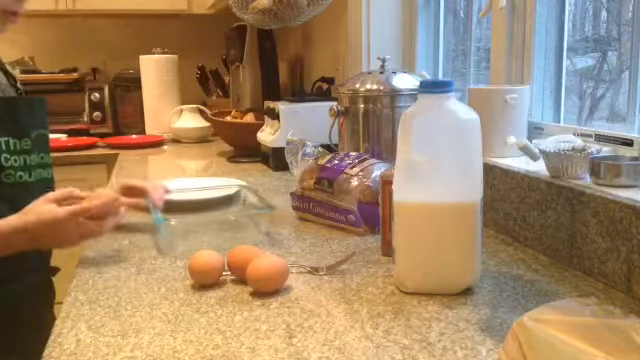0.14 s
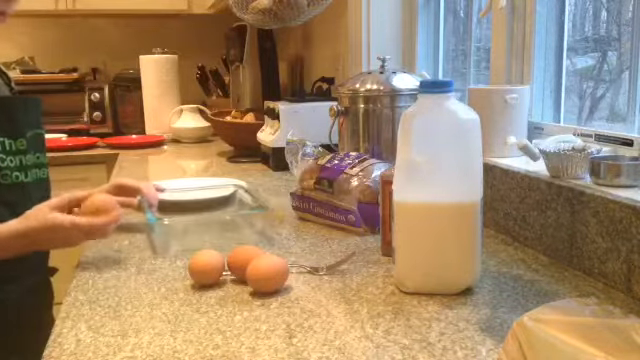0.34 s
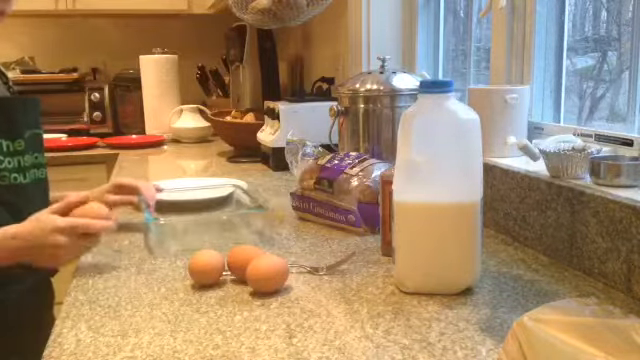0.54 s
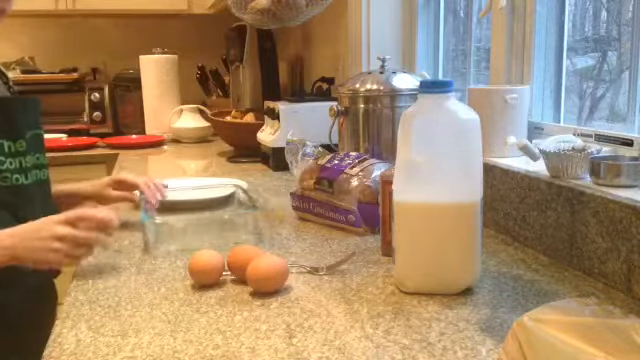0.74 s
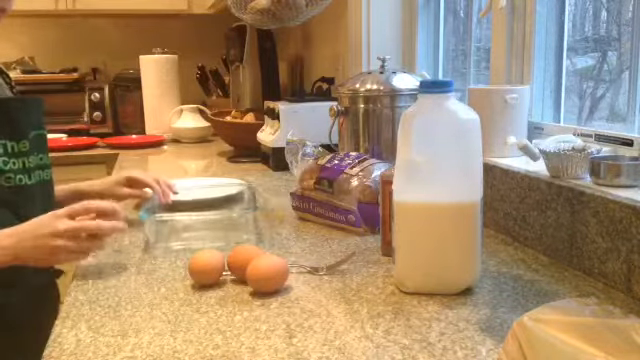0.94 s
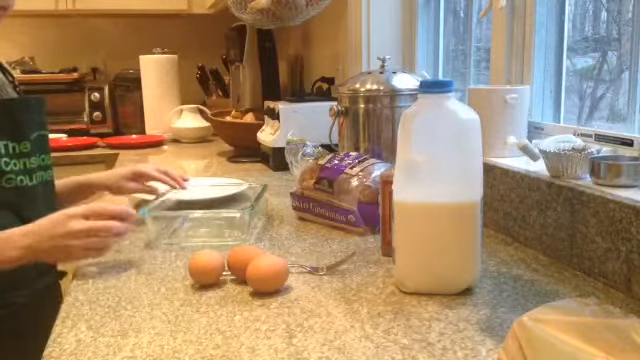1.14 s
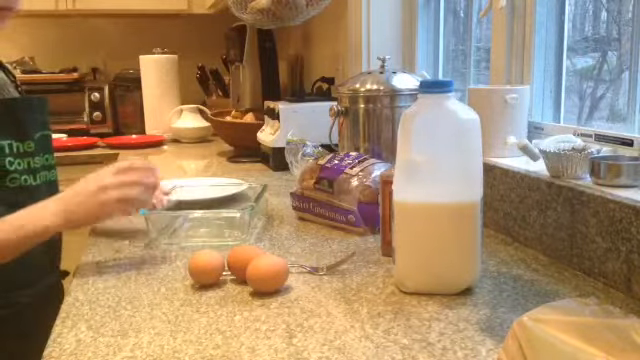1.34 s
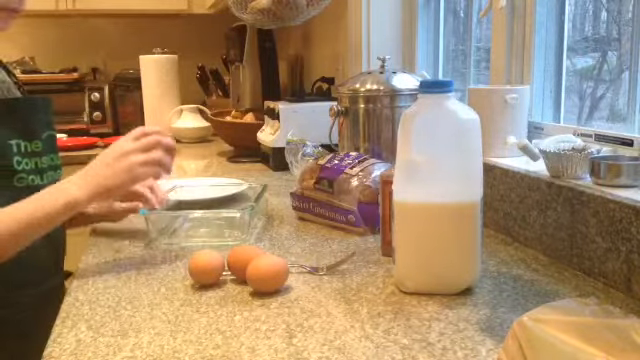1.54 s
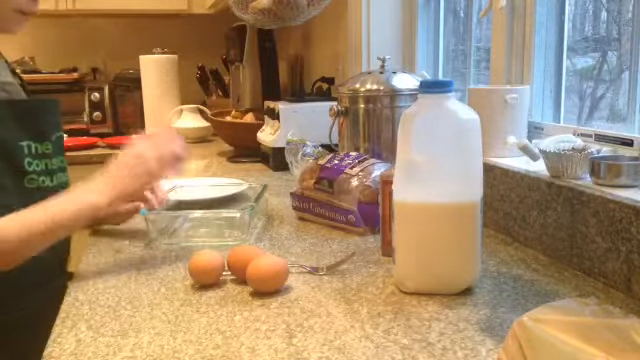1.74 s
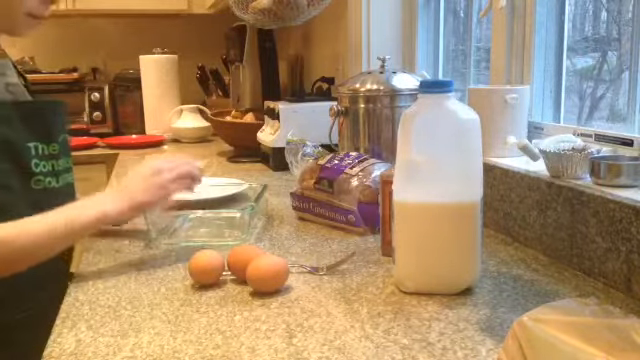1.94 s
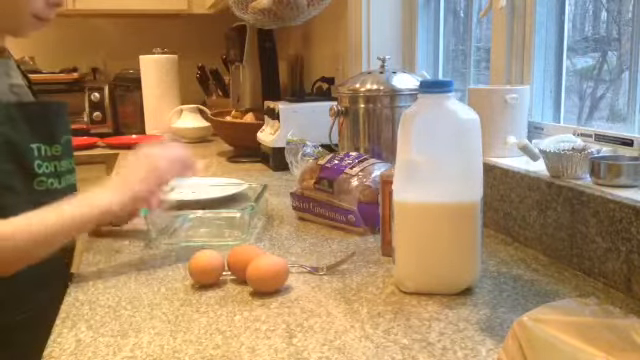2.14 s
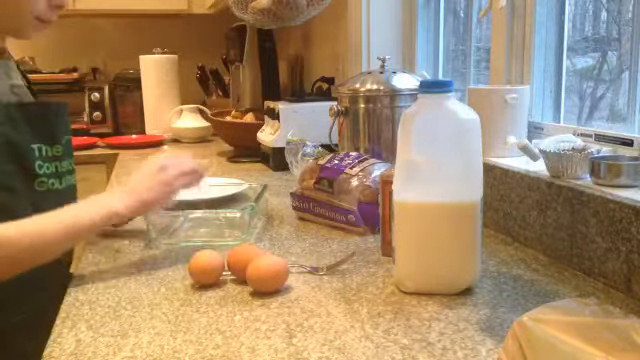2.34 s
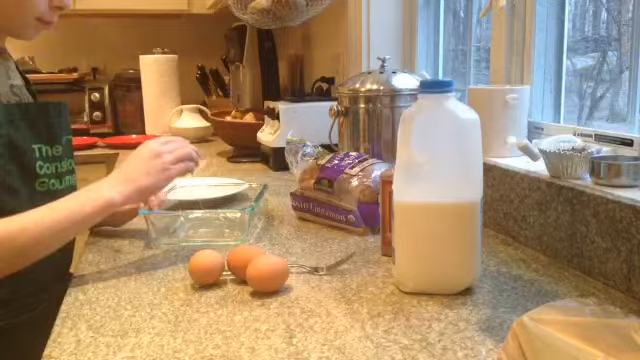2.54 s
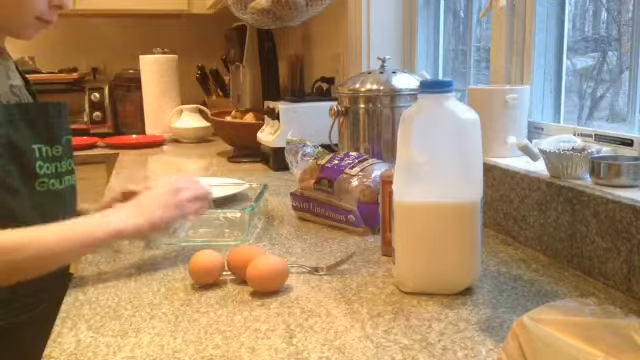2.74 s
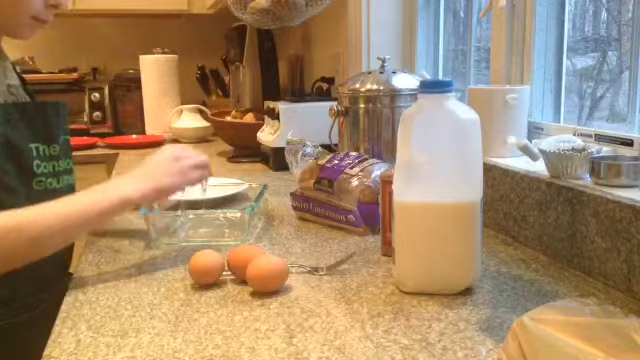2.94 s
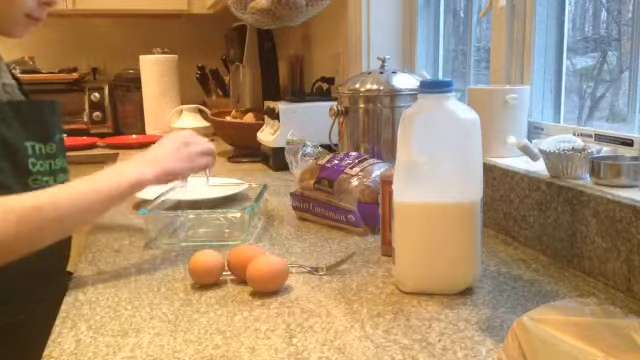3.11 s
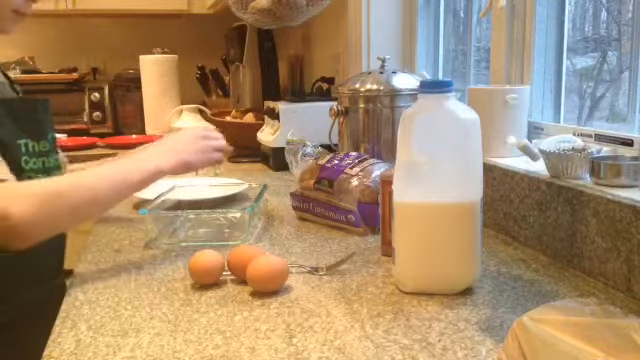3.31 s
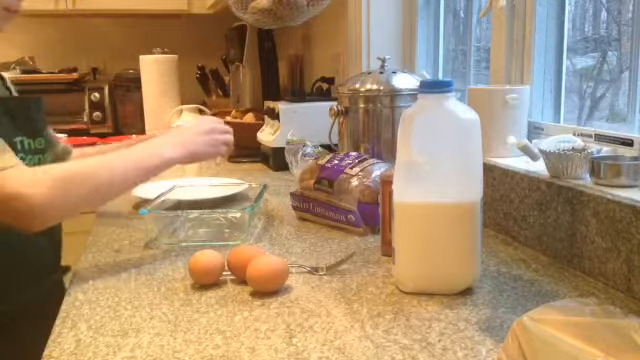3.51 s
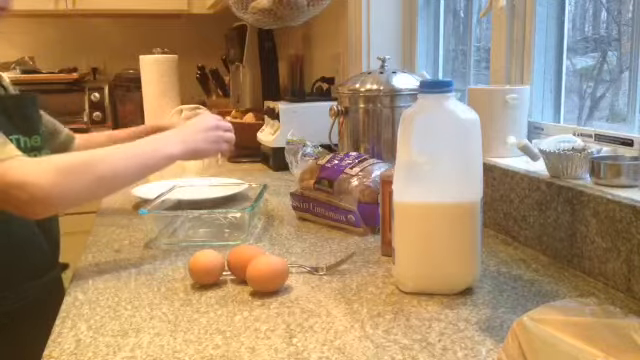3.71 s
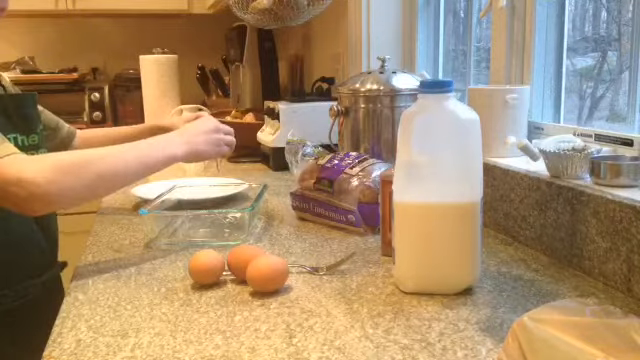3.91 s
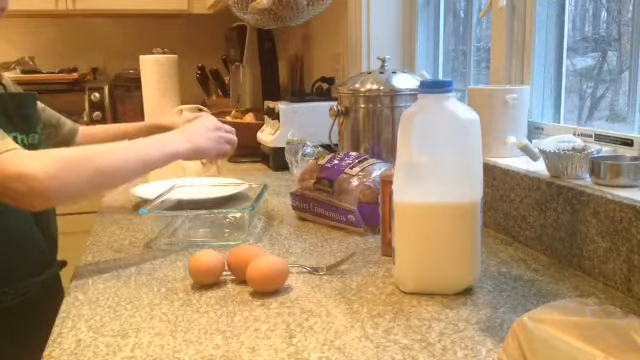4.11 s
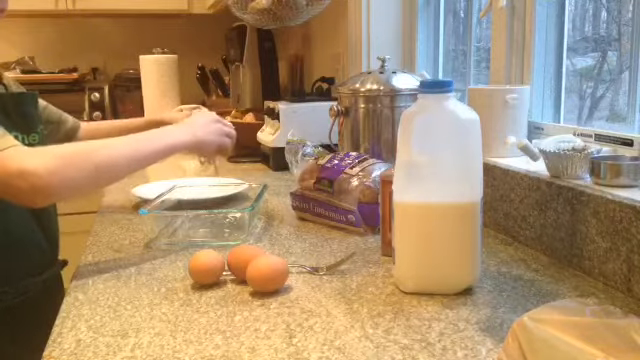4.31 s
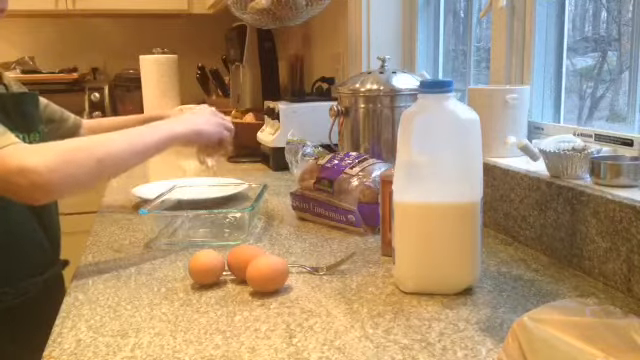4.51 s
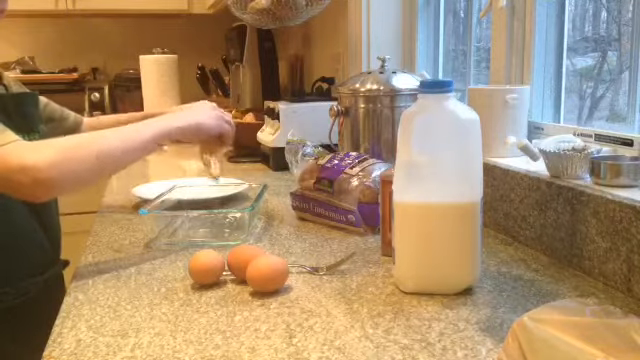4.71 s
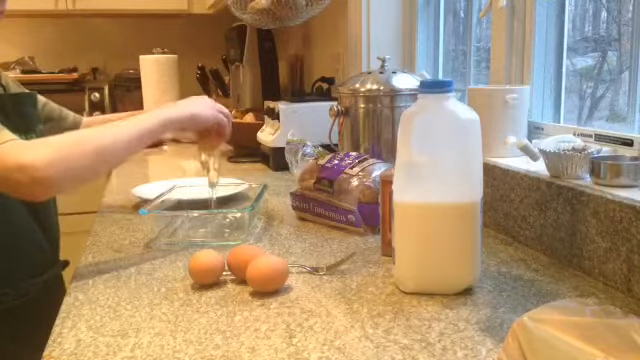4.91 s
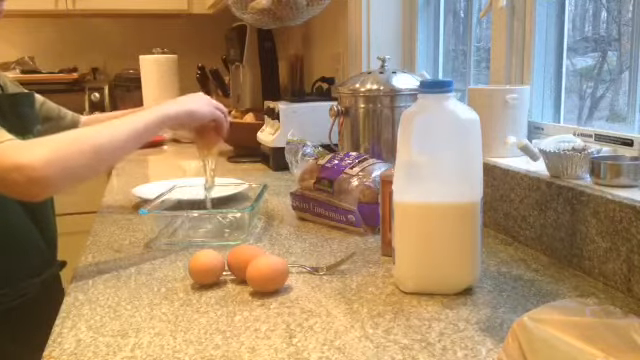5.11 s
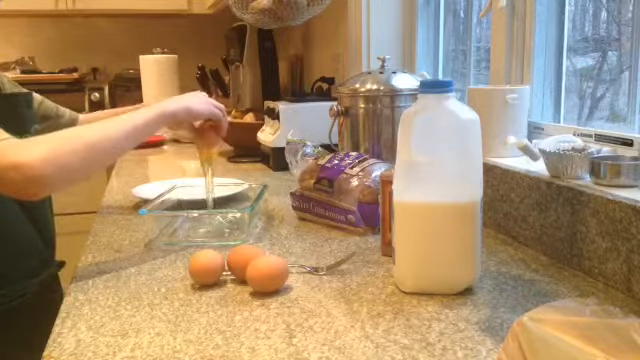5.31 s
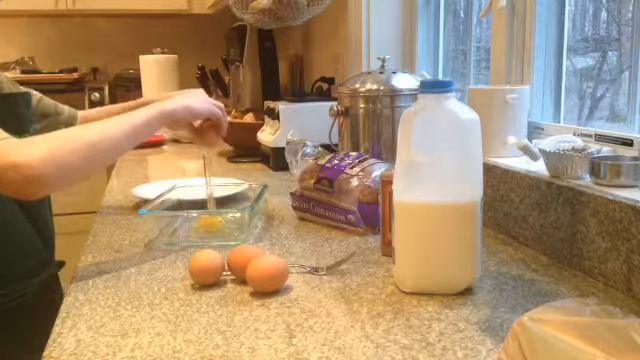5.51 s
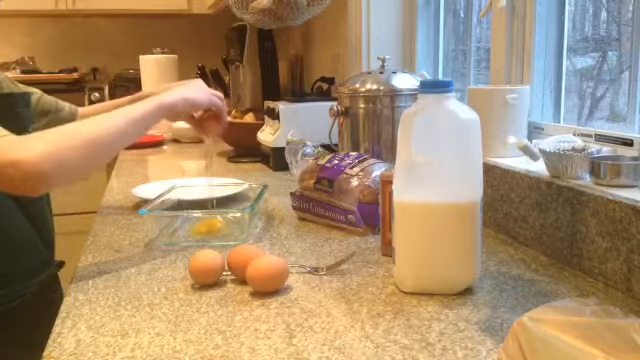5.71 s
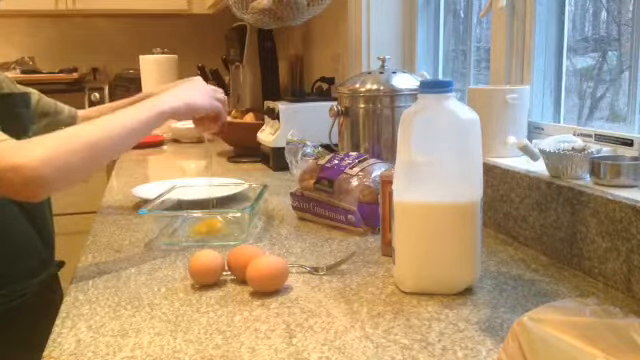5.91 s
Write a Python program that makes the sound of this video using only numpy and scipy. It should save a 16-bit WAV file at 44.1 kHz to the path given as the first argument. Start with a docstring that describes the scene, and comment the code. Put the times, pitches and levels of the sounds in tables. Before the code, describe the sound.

A glass dish scrapes on a stone counter, then an egg is knocked three times on its rim and pried open with wet crackles.

```python
"""Over the faint, steady hum of an appliance, a glass dish is nudged into place on a stone counter:
it scrapes, bumps and skids, while fingers tick on an egg. The egg is knocked three times on the rim;
each impact crushes shell and sets the glass ringing, and the dish rocks back after the last two.
Thumbs pry the shell apart in brittle snaps and crackles, the wet inside squelches, and it drops into
the dish with a light clink. The hard room reverberates after every sound, heard at one microphone."""
import sys
import numpy as np
from scipy import signal
from scipy.fft import rfft, irfft
from scipy.io import wavfile

SR = 44100
rng = np.random.default_rng(int(sys.argv[2]) if len(sys.argv) > 2 else 0)


def wrap_up_sound(samples):
    """Save the sound to the file named by the first command line argument, as 16-bit audio."""
    columns = np.atleast_2d(samples).T
    # keep every value between -1 and 1, then stretch to whole-number steps
    tamed = np.clip(columns, -1, 1)
    steps = np.round(tamed * 32767).astype(np.int16)
    wavfile.write(sys.argv[1], SR, steps)


N = 262395
TIME = np.arange(N) / SR
BURST_TIME = np.arange(SR // 5) / SR   # time axis of one contact

# blows of the egg on the rim, in which the shell cracks, gives way and knocks the dish:
# start_s, crack_db, give_s, knock_db, crush_s, knock_tilt_db_per_octave, ring_db
EGG_BLOWS = [(1.8555, -20, 0.00096, -8, .007, 1.26, -17), (2.2362, -18, .0028, -8.5, .0034, 3, -23.5),
             (2.731, -24, .0078, -12, .0029, -2.5, -33)]
# spectrum of fracturing eggshell: frequency_hz, density_db
SHELL_SPECTRUM = [(300, -18), (800, -13), (1500, -4), (2800, -3), (4400, -4), (6200, -2.5), (9300, -1.5),
                  (11500, -7.5), (15500, -4.5)]


def from_db(db):
    """Amplitude ratio of a level in decibels."""
    return 10 ** (np.asarray(db) / 20)


def unit(x):
    """Normalisation to an energy of 1."""
    return x / np.sqrt(np.sum(x ** 2) + 1e-20)


def at_level(x, db):
    """Equivalent level: the energy of the sound, packed into 10 ms, has this rms level."""
    return unit(x) * np.sqrt(SR / 100) * from_db(db)


def at_hz(points, hz):
    """Interpolation of a table on a logarithmic frequency axis."""
    table_hz, values = np.transpose(points)
    return np.interp(np.log(hz + 1), np.log(table_hz), values)


def add(track, start_s, sound):
    """Superposition: a sound sums into the track from its start time."""
    start = int(round(start_s * SR))
    track[start:start + len(sound)] += sound[:N - start]


def colour(x, spectrum, tilt_db=0, size=4096):
    """Minimum-phase filtering by a spectrum, tilted by tilt_db per octave above 1 kHz."""
    hz = np.arange(size // 2 + 1) * SR / size
    db = at_hz(spectrum, hz) + tilt_db * np.log2(np.maximum(hz / 1000, 1))
    cepstrum = irfft(np.log(from_db(db)))
    causal = 2 * cepstrum[:size // 2] * (np.arange(size // 2) > 0)
    response = irfft(np.exp(rfft(causal, size)))
    return signal.fftconvolve(x, response)[:len(x)]


def resonance(x, hz, width_hz):
    """A damped oscillator: a two-pole band-pass that rings longer the narrower it is."""
    radius = np.exp(-np.pi * width_hz / SR)
    feedback = [1, -2 * radius * np.cos(2 * np.pi * hz / SR), radius * radius]
    return signal.lfilter([1, 0, -1], feedback, x + 1e-18)


def double_resonance(x, hz, width_hz):
    """Two equal resonators in cascade give a peak with steeper skirts."""
    return resonance(resonance(x, hz, width_hz), hz, width_hz)


def grains(count, per_s, spread_db):
    """Shot noise: impulses at random times, of random sign and size."""
    sizes = from_db(spread_db * np.minimum(rng.exponential(1, count), 4)) * rng.choice([-1, 1], count)
    return sizes * (rng.random(count) < per_s / SR)


def contact(length_s, first=0.34, per_s=5000):
    """Rough contact: an impulse of size `first`, then a decaying spray of micro-fractures or slips."""
    decay = np.exp(-BURST_TIME / length_s)
    spray = unit(grains(len(BURST_TIME), per_s, spread_db=3.5) * decay)
    spray[0] += first
    return spray


def appliance(air_db=-58.5):
    """Broadband air noise lies under the tones of a motor, each slowly modulated in amplitude."""
    # steady noise of the room: frequency_hz, density_db
    air_spectrum = [(30, -31), (80, -24), (105, -5), (150, -4), (200, 2), (350, 0.5), (450, -12.5),
                    (1000, -11.5), (1400, -20.5), (2000, -25), (3000, -30), (6000, -30.5), (10000, -32),
                    (15000, -35.5)]
    # tones of the motor: pitch_hz, rms_level_db
    motor_tones = [(119.7, -66), (191, -69.5), (239.5, -62.5), (330, -68)]
    out = from_db(air_db) * unit(colour(rng.standard_normal(N), air_spectrum)) * np.sqrt(N)
    knots_s = np.linspace(0, TIME[-1], 60)
    for hz, db in motor_tones:
        swell = 1 + .35 * np.interp(TIME, knots_s, rng.standard_normal(len(knots_s)))
        out += from_db(db) * np.sqrt(2) * swell * np.sin(2 * np.pi * (hz * TIME + rng.random()))
    return out


def dish_slide():
    """Sliding friction: countless small slips of glass on stone merge into a scrape."""
    # envelope of the scrape: time_s, level_db
    slide_levels = [(0, -59.5), (.05, -49.5), (.13, -55.5), (.17, -49.5), (.24, -51), (.29, -59),
                    (.41, -57), (.6, -61.5), (.81, -60.5), (.92, -51.5), (1.12, -49), (1.15, -59),
                    (1.25, -61), (1.84, -63.5)]
    # glass sliding on stone: frequency_hz, density_db
    scrape_spectrum = [(200, -7), (450, -11.5), (780, -3), (1150, -8), (1400, 4), (1700, -5.5), (2300, -9),
                       (3000, -21), (3700, -17.5), (4300, -14), (5200, -29.5), (7600, -25.5), (15000, -40)]
    times_s, levels_db = np.transpose(slide_levels)
    envelope = from_db(np.interp(TIME, times_s, levels_db, left=-200, right=-200))
    slips = grains(N, per_s=1700, spread_db=2.0)
    return envelope * unit(colour(slips, scrape_spectrum)) * np.sqrt(N)


def dish_squeak(start_s=.025, level_db=-40, pitch_hz=2050, length_s=.05):
    """Friction excites a narrow resonance as the glass starts to move."""
    out = np.zeros(N)
    squeak = resonance(contact(length_s, first=0), pitch_hz, width_hz=260)
    add(out, start_s, at_level(resonance(squeak, pitch_hz, width_hz=370), level_db))
    return out


def dish_bumps(bump_db=-9.5, thud_db=-17.5, thud_hz=290, firm_contact_s=0.00538):
    """Contact time shapes an impact: the longer and softer it is, the less treble and the more thud."""
    # hand and dish bumping on the counter: start_s, level_db, contact_s
    bumps = [(.468, -33, 0.015), (.481, -26, 0.013), (0.536, -43.5, 0.019), (0.735, -30.5, 0.0036),
             (.921, -29, 0.0077), (1.063, -32.5, 0.0043), (1.079, -28, 0.0061), (1.114, -28.5, 0.0039)]
    # a firm bump: frequency_hz, density_db
    bump_spectrum = [(150, -11.5), (320, -5.5), (460, -8), (850, 1), (1400, -4), (2200, -8), (3000, -13),
                     (4200, -20.5), (6000, -36.5), (15000, -58.5)]
    dulling_db_per_octave, thud_gain_db = 6.5, 10   # for each doubling of contact time
    out = np.zeros(N)
    for start_s, db, contact_s in bumps:
        doublings = np.log2(contact_s / firm_contact_s)
        bump = colour(contact(contact_s, first=0.3), bump_spectrum, -dulling_db_per_octave * doublings)
        add(out, start_s, at_level(bump, db + bump_db))
        thud = resonance(contact(contact_s), thud_hz, width_hz=26.5)
        thud = resonance(thud, thud_hz, width_hz=63)
        add(out, start_s, at_level(thud, db + thud_db + thud_gain_db * doublings))
    return out


def finger_ticks(length_s=0.0022, width_hz=1800):
    """Brief finger contacts excite high, heavily damped resonances of the whole egg."""
    # touches as the egg is held ready: start_s, level_db, pitch_hz
    ticks = [(0.547, -52.5, 5950), (0.582, -59, 7640), (0.863, -57, 8700)]
    out = np.zeros(N)
    for start_s, db, hz in ticks:
        add(out, start_s, at_level(double_resonance(contact(length_s), hz, width_hz), db))
    return out


def dish_skids():
    """Stick-slip motion: the pushed glass stutters over the stone in short bursts."""
    # bursts of slipping: start_s, level_db, length_s
    skids = [(1.558, -36.5, 0.042), (1.596, -45, 0.048), (1.642, -34.5, 0.034)]
    # skidding glass: frequency_hz, density_db
    skid_spectrum = [(300, -1.5), (650, -13), (950, -1.5), (1500, 3), (1750, -4.5), (2100, 3),
                     (3000, -19.5), (3900, -4.5), (5000, -13.5), (5600, -31), (15000, -42.5)]
    out = np.zeros(N)
    for start_s, db, length_s in skids:
        add(out, start_s, at_level(colour(contact(length_s, per_s=2800), skid_spectrum), db))
    return out


def crush(length_s):
    """Progressive fracture: dense micro-cracks swell to a peak at length_s, then die away."""
    age = BURST_TIME / length_s
    return grains(len(BURST_TIME), per_s=16000, spread_db=1) * age * np.exp(-age)


def knocks_on_dish(rock_s=.0029, rock_tilt_db=-1, rock_ring_db=-13):
    """Impacts from the egg and from rocking: start_s, level_db, contact_s, tilt_db_per_octave, ring_db."""
    # the dish falls back onto the counter: start_s, level_db
    rocks = [(2.297, -21.5), (2.802, -22.5)]
    struck = [(start_s + give_s, db, crush_s, tilt_db, ring_db)
              for start_s, _, give_s, db, crush_s, tilt_db, ring_db in EGG_BLOWS]
    rocked = [(start_s, db, rock_s, rock_tilt_db, db + rock_ring_db) for start_s, db in rocks]
    return struck + rocked


def egg_on_rim(fracture_db=-4, touch_db=-4, knock_db=-1.5, crack_s=0.002):
    """Each impact fractures the shell, brighter when harder, and drives the dish against the stone."""
    # egg and dish knocking on the counter: frequency_hz, density_db
    knock_spectrum = [(60, -38), (150, -20.5), (330, -11.5), (430, -19), (560, -6.5), (800, 3),
                      (1100, -0.5), (1650, 5), (2100, -6.5), (2500, -4), (3000, -16), (4500, -20.5),
                      (6000, -50), (15000, -39.5)]
    neutral_db, brightening = -17, .7   # crack level with no tilt; dB per octave for each dB above it
    out = np.zeros(N)
    for start_s, db, *_ in EGG_BLOWS:
        crack = colour(crush(crack_s), SHELL_SPECTRUM, brightening * (db - neutral_db))
        add(out, start_s, at_level(crack, db + fracture_db))
        first_touch = colour(crush(crack_s), knock_spectrum)
        add(out, start_s, at_level(first_touch, db + touch_db))
    for start_s, db, contact_s, tilt_db, _ in knocks_on_dish():
        knock = colour(crush(contact_s), knock_spectrum, tilt_db)
        add(out, start_s, at_level(knock, db + knock_db))
    return out


def ring(modes, length_s, uneven_db=3.5):
    """Modal vibration: one rough, cushioned contact drives each mode with a slightly random strength."""
    force = np.pad(contact(length_s, first=0.9), (0, SR // 2))
    out = 0
    for hz, db, t60_s in modes:
        cushioned = signal.sosfilt(signal.butter(1, hz, fs=SR, output="sos"), force + 1e-18)
        mode = resonance(cushioned, hz, width_hz=np.log(1000) / (np.pi * t60_s))
        out = out + at_level(mode, db + uneven_db * rng.normal())
    return out


def glass_ring(body_db=-20, rim_db=-2.0):
    """Free vibration: after each knock the body and rim of the dish ring at their natural frequencies."""
    # damped modes of the dish resting on stone: pitch_hz, level_db, t60_s
    body_modes = [(790, -3, .05), (905, -1, .06), (1148, -5, .07), (1321, -4, .09), (1392, -1, .05),
                  (1640, 0, .05), (1740, -1, .06), (2316, -7, .08), (2410, -6, .04)]
    # modes of the glass rim: pitch_hz, level_db, t60_s
    rim_modes = [(2662, -8, .06), (3495, -1, .06), (3872, -8, .09), (4075, -17, .15), (4278, -1, .055),
                 (4283, -22, .6), (4712, -14, .08), (5395, -18, .06), (5790, -21, .08), (6072, -22, .1),
                 (6720, -17, .09), (7527, -16, .09), (7700, -21, .08), (8280, -24, .08), (8732, -23, .1)]
    out = np.zeros(N)
    for knock_s, db, contact_s, _, ring_db in knocks_on_dish():
        start_s = knock_s + .9 * contact_s   # the ring starts as the knock nears its peak
        add(out, start_s, from_db(db + body_db) * ring(body_modes, contact_s))
        add(out, start_s, from_db(ring_db + rim_db) * ring(rim_modes, contact_s))
    return out


def shell_crackle(attack_s=0.0059, release_s=0.024):
    """Acoustic emission: the shell crackles finely as thumb pressure rises, holds and lets go."""
    # spells of prying: start_s, length_s, level_db
    pries = [(3.778, 0.16, -59.5), (4.365, 0.035, -58), (4.484, 0.056, -59), (5.108, 0.063, -54),
             (5.222, 0.1, -54)]
    pressure = np.zeros(N)
    for start_s, length_s, db in pries:
        rise = np.clip((TIME - start_s) / attack_s, 0, 1)
        release = np.exp(-np.maximum(TIME - start_s - length_s, 0) / release_s)
        pressure += from_db(db) * rise * release
    crackle = colour(grains(N, per_s=150, spread_db=4), SHELL_SPECTRUM, tilt_db=-1.0)
    return pressure * unit(crackle) * np.sqrt(N)


def shell_snaps(snap_s=0.0023, click_db=-10, crumbs_s=0.014, crumbs_db=-4):
    """Brittle fracture: the breaking flake resonates, the whole shell clicks, and crumbs are shed."""
    # snaps under the thumbs, higher for smaller flakes: start_s, level_db, pitch_hz
    snaps = [(3.6491, -54, 4600), (3.8003, -52, 7840), (3.8239, -54.5, 8500), (3.843, -49.5, 7500),
             (3.9934, -54, 5860), (4.1806, -64, 5580), (4.296, -60, 7000), (4.3199, -44.5, 4300),
             (4.378, -48, 6470), (4.4079, -47.5, 5500), (4.422, -37.5, 5060), (4.5763, -51, 6000),
             (4.7203, -44.5, 8150), (4.7319, -40.5, 7000), (4.7834, -47, 12000), (4.8404, -46, 7500),
             (4.8655, -47, 6550), (5.0865, -53, 3960), (5.1469, -47, 4660), (5.269, -46, 4700),
             (5.3319, -43, 3480), (5.378, -42.5, 5230), (5.435, -55, 6100), (5.7288, -54, 6140)]
    # broad resonances of a flake: centre_hz, width_hz
    flake_modes = [(1900, 3400), (4100, 2130), (8900, 4100), (13200, 15000)]
    octave_off_db = -5   # level of a resonance one octave from the snap's pitch
    out = np.zeros(N)
    for start_s, db, pitch_hz in snaps:
        crack = contact(snap_s, first=1.0, per_s=3500)
        flake = 0
        for hz, width_hz in flake_modes:
            mode_db = octave_off_db * np.log2(hz / pitch_hz) ** 2
            flake = flake + at_level(double_resonance(crack, hz, width_hz), mode_db)
        click = colour(crack, SHELL_SPECTRUM, tilt_db=-3.5)
        add(out, start_s, at_level(unit(flake) + from_db(click_db) * unit(click), db))
        crumbs = colour(contact(crumbs_s, first=0, per_s=350), SHELL_SPECTRUM)
        add(out, start_s, at_level(crumbs, db + crumbs_db))
    return out


def egg_squelches(pop_count=5, decay_s=0.015, relative_width=.22):
    """Cavity resonance: wet pockets of slightly different sizes open in clusters of sticky pops."""
    # pockets opening inside the egg: start_s, level_db, pitch_hz
    squelches = [(4.421, -51.5, 1380), (4.714, -54, 800), (4.84, -44.5, 823), (5.137, -50, 1020),
                 (5.145, -49.5, 2120), (5.268, -45.5, 1450), (5.329, -41.5, 1500), (5.371, -44, 1486),
                 (5.921, -57, 1840)]
    out = np.zeros(N)
    for start_s, db, pitch_hz in squelches:
        pops = 0
        for hz in pitch_hz * np.geomspace(.93, 1.08, pop_count):
            opening = contact(decay_s, first=.1, per_s=900)
            pops = pops + unit(double_resonance(opening, hz, relative_width * hz))
        add(out, start_s, at_level(pops, db))
    return out


def drop_clink(start_s=5.590, level_db=-53):
    """A light impact excites a few high modes as the egg drops into the dish."""
    # modes of the clink: pitch_hz, level_db, t60_s
    clink_modes = [(3190, -9, 0.041), (3830, -7, 0.068), (4320, -1, 0.056), (4570, -6, 0.053),
                   (5130, -21, 0.13), (5130, -1, 0.097)]
    out = np.zeros(N)
    add(out, start_s, from_db(level_db) * ring(clink_modes, length_s=0.009, uneven_db=1.5))
    return out


def kitchen(x, early_db=-2.5, early_t60_s=.14, tail_db=-9.5, build_s=0.002):
    """Reverberation: early reflections off counter and cupboards, then a tail whose treble dies first."""
    # reverberation time of the room: frequency_hz, t60_s
    decay_times = [(150, 0.33), (500, 0.57), (1400, 0.54), (3700, 0.59), (7000, 0.4), (14000, 0.24)]
    t = TIME[:SR]
    hz = np.arange(SR // 2 + 1)
    white = rfft(rng.standard_normal(SR))
    edges_hz = np.geomspace(60, SR / 2, 14)
    tail = np.zeros(SR)
    for low, high in zip(edges_hz, edges_hz[1:]):
        band = irfft(white * (hz >= low) * (hz < high))
        tail += band * from_db(-60 * t / at_hz(decay_times, np.sqrt(low * high)))
    tail = unit(tail * (1 - np.exp(-t / build_s)))
    reflections = grains(SR, per_s=4000, spread_db=2) * (t > .002)
    early = unit(reflections * from_db(-60 * t / early_t60_s))
    return signal.fftconvolve(x, from_db(early_db) * early + from_db(tail_db) * tail)[:N]


def scene(hand_room_db=1.0, low_cut_hz=130):
    """Direct and reverberant sound sum at one microphone; the egg, held high, excites the room most."""
    counter = dish_slide() + dish_squeak() + dish_bumps() + dish_skids() + egg_on_rim()
    glass = glass_ring()
    hands = finger_ticks() + shell_crackle() + shell_snaps() + egg_squelches() + drop_clink()
    room = kitchen(counter + .5 * glass + from_db(hand_room_db) * hands)
    low_cut = signal.butter(3, low_cut_hz, "high", fs=SR, output="sos")   # the deep bass of these sounds is cut steeply
    mono = signal.sosfilt(low_cut, counter + glass + hands + room) + appliance()
    return np.array([mono, mono])


def record(dry, ceiling=.95, low_cut_hz=45, high_cut_hz=15450):
    """Soft saturation rounds the loudest peaks; band limiting removes deep bass and the highest treble."""
    rounded = dry / (1 + (dry / ceiling) ** 10) ** .1
    high_pass = signal.butter(1, low_cut_hz, "high", fs=SR, output="sos")
    low_pass = signal.ellip(10, .1, 80, high_cut_hz, fs=SR, output="sos")
    return signal.sosfilt(low_pass, signal.sosfilt(high_pass, rounded))


dry = scene()
out = record(dry)
wrap_up_sound(out)
```